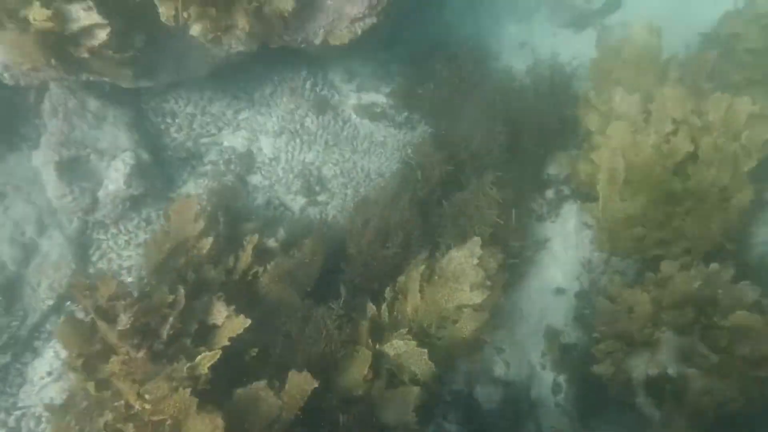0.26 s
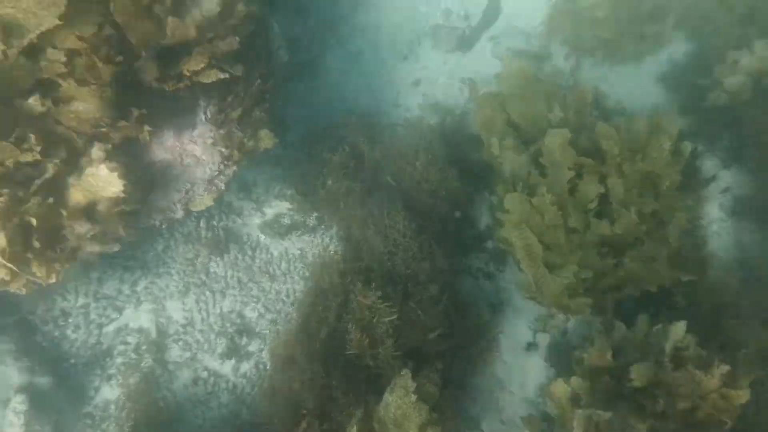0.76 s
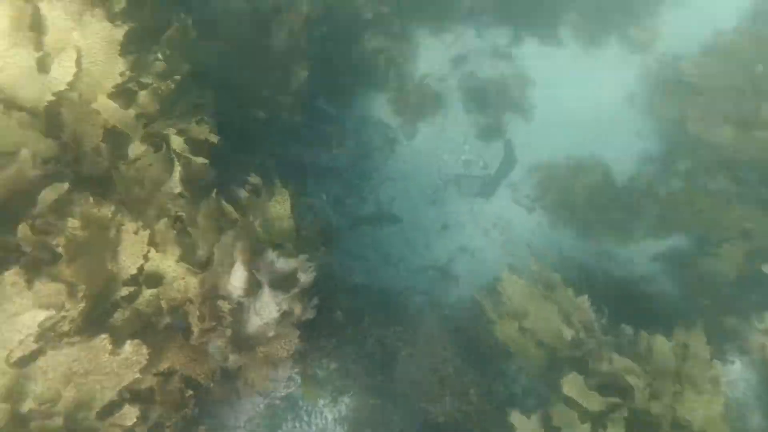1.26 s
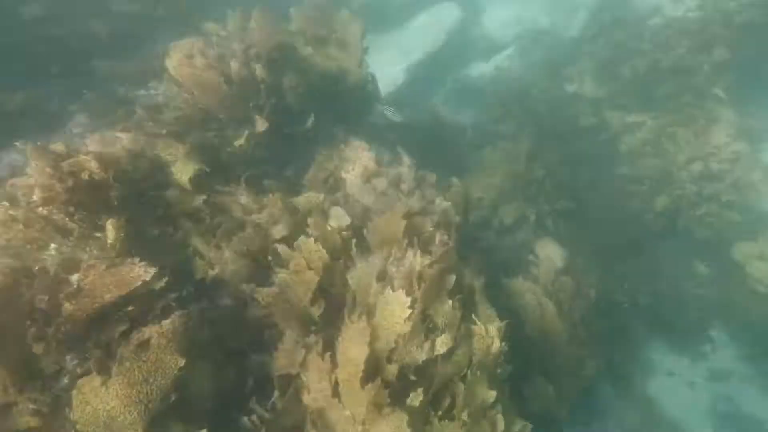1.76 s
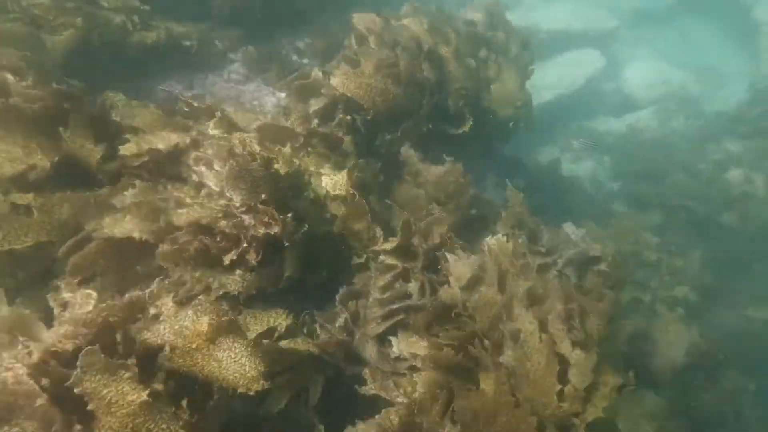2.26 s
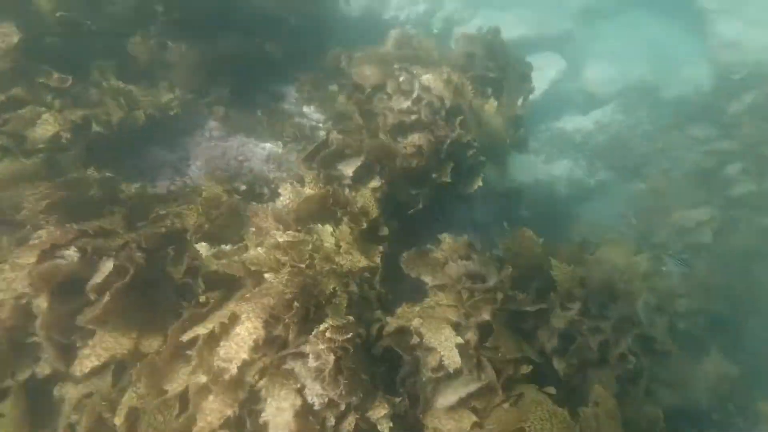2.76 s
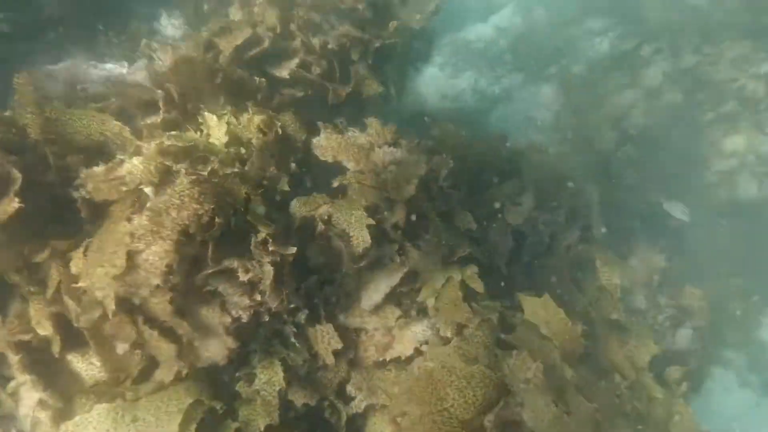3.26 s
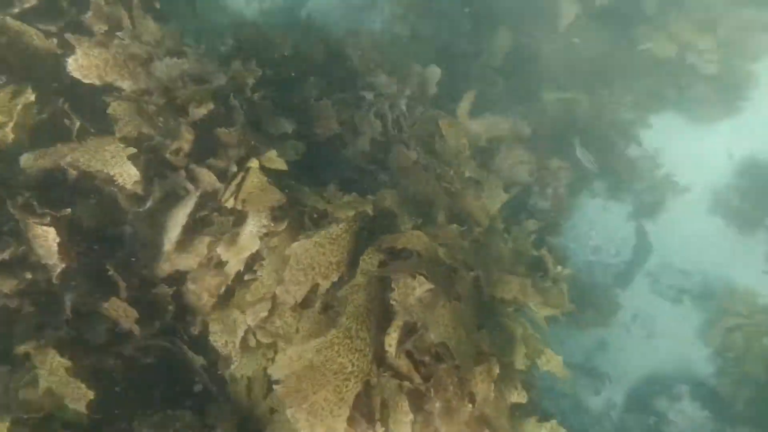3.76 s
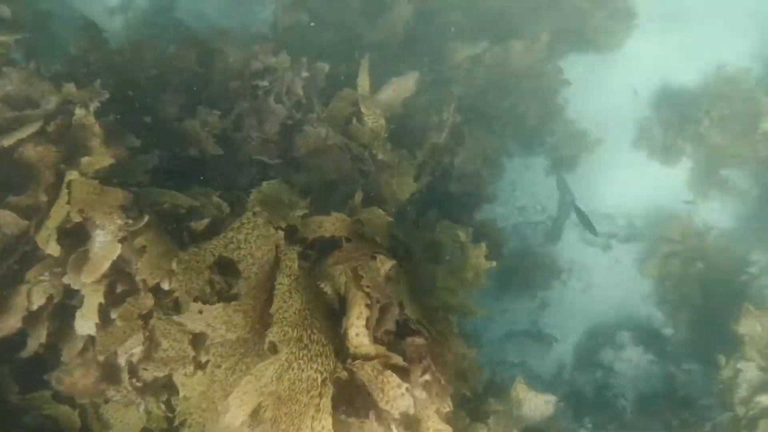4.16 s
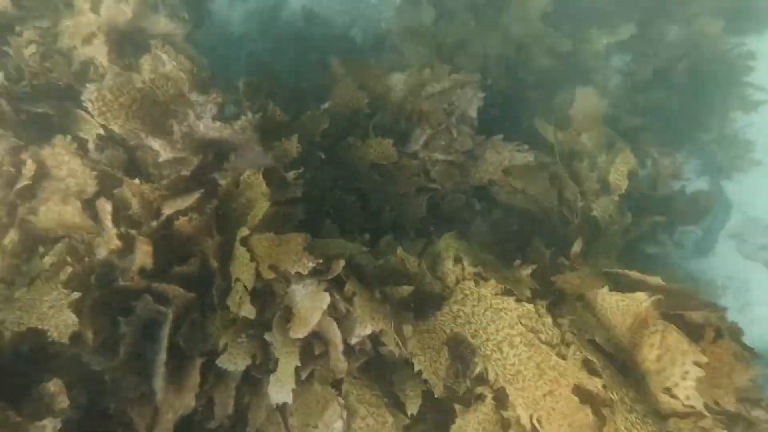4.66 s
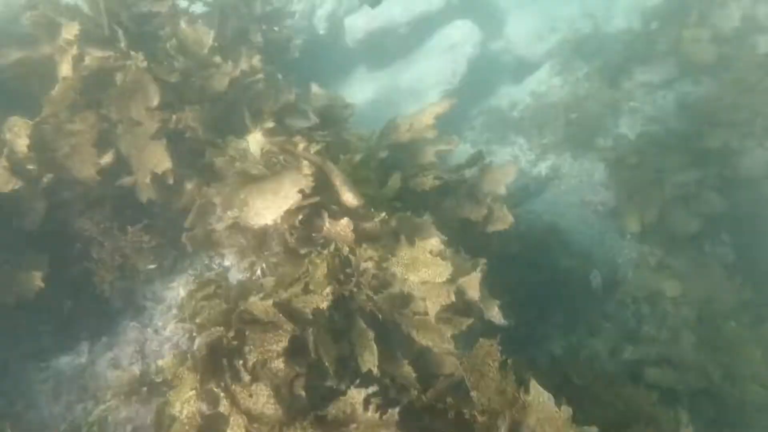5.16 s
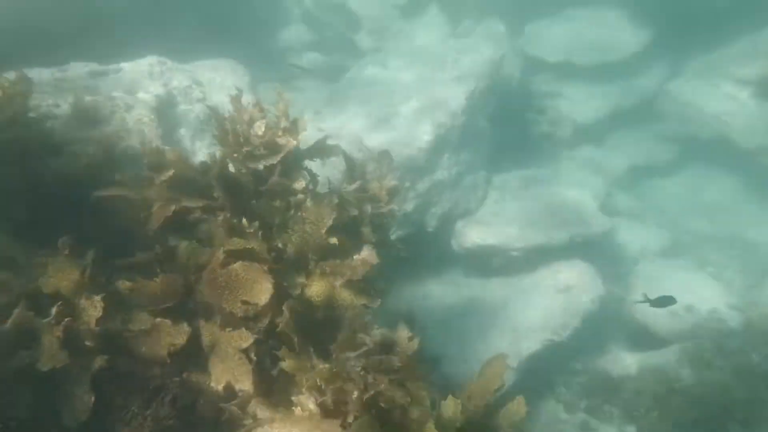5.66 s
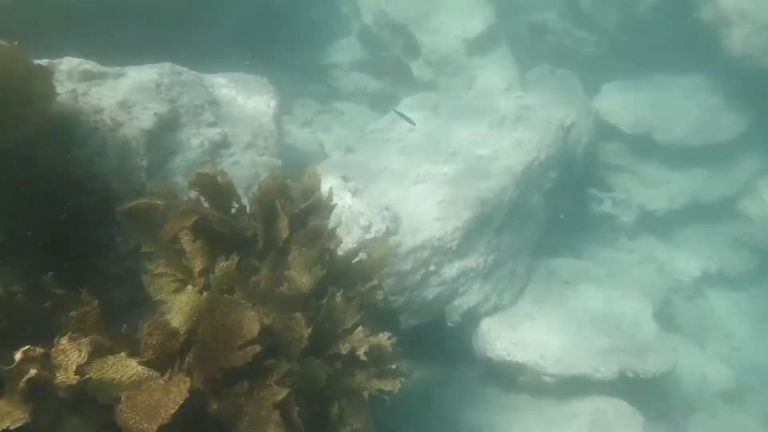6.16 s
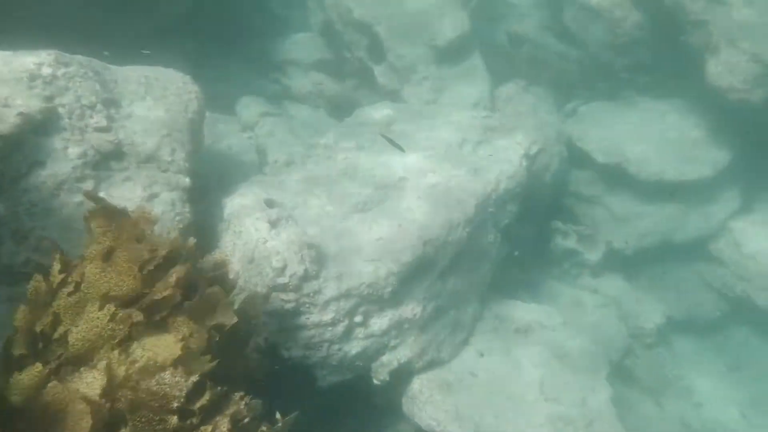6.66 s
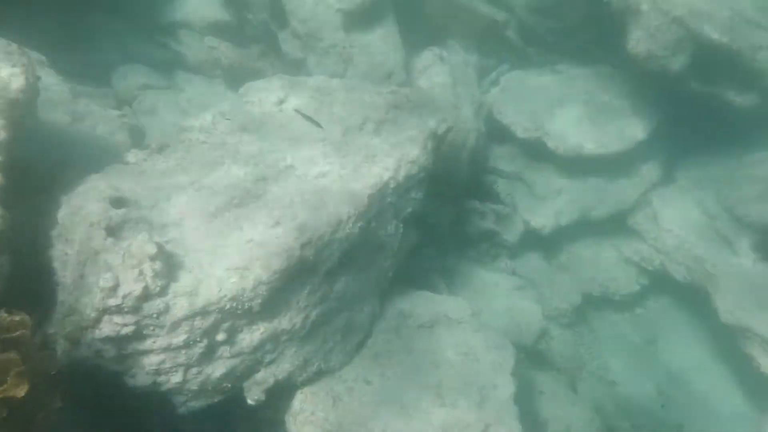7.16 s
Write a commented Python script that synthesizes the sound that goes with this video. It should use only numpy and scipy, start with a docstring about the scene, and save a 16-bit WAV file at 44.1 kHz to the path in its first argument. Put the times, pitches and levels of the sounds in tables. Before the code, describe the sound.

Dense snapping-shrimp crackle over a low underwater rumble, with glugs, knocks and sloshing thumps, briefly cutting to silence before returning sparser and duller.

```python
"""Snapping shrimp crackle all around a camera in a sealed housing that drifts over a shallow kelp reef.
Each snap is a sharp pulse, scattered by rock and coloured by the resonances of the housing; far snaps merge
into a wash. Glugs and short soft knocks are brief ringing tones, some gliding; moving water rumbles, sloshes
and thumps as shaped noise and short rings. The sound cuts out for a moment and returns sparser and duller
over bare boulders.
"""
import sys
import numpy as np
from scipy import signal
from scipy.fft import rfft, irfft, next_fast_len
from scipy.io import wavfile
from scipy.ndimage import uniform_filter1d

SR = 44100
rng = np.random.default_rng(int(sys.argv[2]) if len(sys.argv) > 2 else 0)


def dump_mix(stems):
    """Bounce the given channels to the path in sys.argv[1] as a 16-bit WAV at rate SR."""
    frames = np.atleast_2d(stems).T  # one column per channel
    limited = np.clip(frames, -1, 1)  # hard clip at full scale
    pcm = np.round(limited * 32767).astype(np.int16)
    wavfile.write(sys.argv[1], SR, pcm)


N = 326781
TIME = np.arange(N) / SR
SILENT_FROM, SILENT_TO = 5.853, 6.061  # s, the gap between kelp and boulders
SNAP_SIZE = 2048  # samples


def undb(db):
    """Amplitude ratio: decibels to gain."""
    return 10 ** (np.asarray(db) / 20)


def unit(x):
    """Normalisation: scale to rms 1."""
    return x / np.sqrt(np.mean(x ** 2))


def curves(table):
    """Linear interpolation: each column of a timed table as a value per sample."""
    s, *columns = np.transpose(table)
    return [np.interp(TIME, s, c) for c in columns]


def add(track, s, sound):
    """Superposition: mix a sound into a track at a time in seconds."""
    start = max(int(s * SR), 0)
    part = track[..., start:start + sound.shape[-1]]
    part += sound[..., :part.shape[-1]]


def ports(mid, side):
    """Sum and difference: left and right port from the shared and the opposed motion."""
    return np.array([mid + side, mid - side])


def frequencies(size):
    """Frequency grid in Hz, raised by 1 Hz to keep clear of zero."""
    return np.fft.rfftfreq(size, 1 / SR) + 1


def bands(size):
    """Complementary crossover: low, middle and treble weights that sum to one."""
    f = np.fft.rfftfreq(size, 1 / SR)
    low, below_treble = (1 / (1 + (f / hz) ** 10) for hz in (900, 2400))
    return np.array([low, below_treble - low, 1 - below_treble])


def causal(gain):
    """Minimum phase, by folding the cepstrum: the response starts at once and rings afterwards."""
    cepstrum = irfft(np.log(gain + 1e-7))
    half = cepstrum.shape[-1] // 2
    cepstrum[..., 1:half] *= 2
    cepstrum[..., half + 1:] = 0
    return np.exp(rfft(cepstrum))


def ringing(hz, width, size):
    """Simple resonance: gain of one resonator whose width is a share of its pitch."""
    f = frequencies(size)
    return 1 / np.sqrt(1 + ((f / hz - hz / f) / width) ** 2)


def housing(modes, size):
    """Modal summation: the powers of steep resonances add into shared and opposed gain."""
    f = frequencies(size)
    power = 0
    for hz, width, mid_db, side_db in modes:
        skirt = 1 / (1 + ((f * f - hz * hz) / (f * width)) ** 2)
        power = power + (undb([[mid_db], [side_db]]) * skirt) ** 2
    return np.sqrt(power)


def flurry(rate, depth_db):
    """Slow random modulation: a gain drawn `rate` times a second, with straight dB lines between."""
    knots = rng.standard_normal(1024)
    return undb(depth_db * np.interp(TIME * rate, np.arange(len(knots)), knots))


def grains(low_hz, high_hz, cycles, spread_db, rise, count, size):
    """Shot noise: short rings at random times, pitches and strengths; shared and opposed parts, rms 1."""
    when, pitch, life, strength, direction = rng.random((count, 5)).T[:, :, None]
    hz = low_hz * (high_hz / low_hz) ** pitch
    turns = hz * np.arange(size) / SR
    age = turns / (cycles * 2 ** (2 * life - 1))
    gain = undb(-spread_db * np.log(np.maximum(strength, .02))) * np.sqrt(hz)
    bent_turns = turns * (1 + rise * np.minimum(age, 10) / 10)
    rings = gain * age * np.exp(-age) * np.sin(2 * np.pi * bent_turns)
    places = ((when * N).astype(int) + np.arange(size)).ravel()
    weights = (1, np.cos(np.pi * direction))
    return np.array([unit(np.bincount(places, (rings * w).ravel(), N)[:N]) for w in weights])


def crackle(rings, modes, band, echo, echo_s, wash_db, side_db):
    """Multipath scattering: far rings get ragged echoes, the farthest merge into a wash; shared rms 1."""
    t = np.arange(SNAP_SIZE) / SR
    path = rng.standard_normal((2, SNAP_SIZE)) * np.exp(-t / echo_s)
    path *= echo / np.linalg.norm(path[0])
    path[:, 0] += 1  # the direct sound
    walls = housing(modes, SNAP_SIZE)
    heard_path = irfft(rfft(path) * causal(walls))
    pops = signal.oaconvolve(rings, heard_path, axes=1)[:, :N]
    wash_response = irfft(causal(walls * (np.array(band) @ bands(SNAP_SIZE))))
    wash = signal.oaconvolve(rng.standard_normal((2, N)), wash_response, axes=1)[:, :N]
    mid, side = pops / np.std(pops[0]) + undb(wash_db) * wash / np.std(wash[0])
    return ports(mid, undb(side_db) * side) / np.std(mid)


def hiss():
    """White noise: a faint steady hiss, independent in the two ports."""
    return undb(-77.5) * rng.standard_normal((2, N))


# strength of the moving water: (time [s], rumble level before trim [dB])
SURGE = [(0, -43.5), (.9, -45.5), (1.8, -43.5), (1.92, -40), (2.27, -43), (2.55, -44.5), (3.4, -44),
         (3.9, -45.5), (4.25, -43.5), (4.7, -45), (5, -41.5), (5.36, -43.5), (5.5, -44.5), (5.78, -40.5),
         (6.06, -49), (6.22, -50), (6.42, -50.5), (7.3, -50.5)]
# spectrum of the pressure of the eddies: (frequency [Hz], relative level per Hz [dB])
EDDY_SPECTRUM = [(10, -18.5), (20, -10), (32, 1.5), (50, -11.5), (85, -10), (125, -15), (170, -29),
                 (300, -32), (700, -47.5), (2000, -98)]
# eddies above EDDY_HZ grow faster than the deep rumble, by EDDY_GROWTH dB per dB of surge over CALM_DB
EDDY_HZ, EDDY_GROWTH, CALM_DB = 50, 1, -43.5


def rumble(trim_db=-2.5, side_db=-25):
    """Turbulent pressure: eddies press nearly alike on both ports; stronger flow stirs up smaller ones."""
    hz, db = np.transpose(EDDY_SPECTRUM)
    size = 2 * next_fast_len(N // 2 + 1)
    f = frequencies(size)
    spectrum = rfft(rng.standard_normal((2, size))) * undb(np.interp(np.log(f), np.log(hz), db))
    whole = irfft(spectrum)[:, :N]
    deep = irfft(spectrum / (1 + (f / EDDY_HZ) ** 4))[:, :N]
    surge_db = curves(SURGE)[0]
    small = (whole - deep) * undb(EDDY_GROWTH * (surge_db - CALM_DB))
    mid, side = (deep + small) / np.std(whole)
    heaves = flurry(rate=11, depth_db=1.0)
    return ports(mid, undb(side_db) * side) * undb(surge_db + trim_db) * heaves


# water sloshing past the housing:
# (time [s], half length to 1/e [s], churn peak level [dB], fizz peak level [dB])
SWASHES = [(1.562, 0.042, -56, -52.5), (1.873, 0.022, -34.5, -52), (1.976, 0.023, -30.5, -46.5),
           (2.025, 0.049, -48, -50.5), (2.259, 0.011, -42, -38), (2.319, 0.029, -40.5, -47.5),
           (2.459, 0.027, -76, -43.5), (4.076, 0.012, -41, -47), (4.412, 0.02, -52, -46),
           (5.167, 0.052, -48.5, -58), (5.319, 0.043, -42, -58), (5.705, 0.058, -41, -48)]
# resonances of the churning water:
# (frequency [Hz], width [Hz], relative level alike in both ports [dB], relative level opposed [dB])
CHURN_MODES = [(104, 79, -5.5, -22), (219, 54, -2.5, -31), (305, 1600, -3.5, -37.5), (552, 96, -5, -39.5)]
# resonances of the housing over the kelp, also heard by the shrimp there:
# (frequency [Hz], width [Hz], relative level alike in both ports [dB], relative level opposed [dB])
KELP_MODES = [(336, 350, -4.5, -22.5), (587, 650, -3, -38.5), (980, 1090, -4, -53.5),
              (1408, 390, 2.5, -8.5), (2064, 280, -7.5, -8), (2770, 480, -25.5, -16.5),
              (3136, 360, -10, -13.5), (3514, 1250, -39, -2.5), (4500, 830, -12, -24),
              (5200, 770, -18, -31.5), (6300, 1140, -16, -10), (7920, 2560, -28, -23.5),
              (9550, 3800, -51, -35.5), (12150, 2500, -65, -62.5), (15100, 1000, -47, -43.5)]


def swashes():
    """Bubble entrainment: a shove of water churns large air pockets and tears off a fizz of tiny ones."""
    large = grains(87.7, 625, cycles=2.1, spread_db=2.0, rise=0.022, count=420, size=2048)
    tiny = grains(1797, 7960, cycles=2.35, spread_db=3.5, rise=0.034, count=5000, size=192)
    churn = crackle(large, CHURN_MODES, (1, 0, 0), echo=0.27, echo_s=0.04, wash_db=-13, side_db=3.0)
    fizz = crackle(tiny, KELP_MODES, (0, .2, 1), echo=0.4, echo_s=0.0053, wash_db=-10.5, side_db=-5.0)
    s, half, churn_db, fizz_db = np.transpose(SWASHES)[:, :, None]
    swell = np.exp(-np.minimum(((TIME - s) / half) ** 2, 20))
    churn_gain = np.sum(swell * undb(churn_db), axis=0)
    fizz_gain = np.sum(swell * undb(fizz_db), axis=0)
    return churn * churn_gain + fizz * fizz_gain


PORT_LAG_S, PORT_LAG_SPREAD_S = 2e-5, 3e-5  # mean and spread of how much later a ring reaches the left port


def damped_rings(table, attack_s, splash, splash_s, waver, waver_s):
    """Damped oscillation: each (s, Hz, dB, decay s, octaves/s) is jolted, then rings at a wavering pitch."""
    out, t = np.zeros((2, N)), np.arange(SR // 4) / SR
    chance, slow = rng.standard_normal((len(table), 2, len(t))), int(waver_s * SR)
    for (s, hz, db, decay, glide), noise in zip(table, chance):
        jolt, wobble = (unit(uniform_filter1d(uniform_filter1d(n, slow), slow)) for n in noise)
        pitch = hz * (2 ** (glide * np.minimum(t, 3 * decay)) + waver * wobble)
        phase = 2 * np.pi * np.cumsum(pitch) / SR
        swell = (1 - np.exp(-t / attack_s)) ** 2 * np.exp(-t / decay)
        turn = np.pi * hz * (PORT_LAG_S + PORT_LAG_SPREAD_S * noise[0, 0])  # half the phase lag
        ring = swell / swell.max() * np.sin(ports(phase, -turn))
        add(out, s, undb(db) * ring * (1 + splash * jolt * np.exp(-t / splash_s)))
    return out


def hum():
    """Frequency glide: a faint low tone rises at the very end."""
    return damped_rings([(7.17, 145.7, -60, .3, 0.94)], attack_s=.015, splash=.2, splash_s=.05,
                        waver=0.031, waver_s=0.0035)


# water shoving the housing: (time [s], pitch [Hz], peak level before the jolt [dB], decay time [s])
THUMPS = [(1.873, 192, -30.5, 0.011), (1.881, 114, -30.5, 0.024), (1.965, 119.4, -26, 0.029),
          (2.004, 34.8, -27.5, 0.03), (2.11, 116, -39.5, 0.032), (2.204, 47, -28.5, 0.022),
          (2.243, 118.2, -37, 0.025), (5.348, 46.3, -29.5, 0.017), (5.587, 111.4, -29, 0.0065),
          (5.705, 113.4, -26, 0.035), (5.765, 34.7, -38, 0.0091)]


def thumps():
    """Impulsive loading: shoves of water knock on the housing or heave slowly against it."""
    return damped_rings([(*row, 0) for row in THUMPS], attack_s=0.0037, splash=.3, splash_s=0.0077,
                        waver=0.049, waver_s=0.0015)


# air pockets and short soft knocks:
# (time [s], starting pitch [Hz], peak level before the jolt [dB], decay time [s], glide [octaves/s])
GLUGS_AND_KNOCKS = [(.521, 349, -27, .016, -3), (.653, 232, -34.5, 0.015, 2), (.895, 312, -21, .011, 15.5),
                    (1.552, 288, -26, 0.011, -8.5), (1.715, 1466, -28.5, 0.022, 1.5),
                    (1.745, 1550, -29, 0.0043, 1), (1.843, 436, -32.5, 0.0053, 2),
                    (1.888, 460, -34.5, 0.016, 1.5), (1.914, 1360, -32.5, 0.0065, 0),
                    (1.962, 438, -31, 0.01, -3), (2.017, 1460, -29, 0.0051, 5.5),
                    (2.316, 306, -25.5, 0.005, -4), (2.444, 1406, -22.5, 0.0036, 2),
                    (2.845, 180, -28.5, 0.0041, 0), (3.68, 458, -20, 0.0052, -11),
                    (3.718, 1320, -25.5, 0.0096, -2), (3.852, 498, -32, 0.026, 1.5),
                    (3.854, 1394, -21.5, 0.013, -9), (4.061, 268, -19, 0.017, -6),
                    (4.457, 366, -22, 0.0093, 5.5), (4.711, 1380, -30.5, 0.0066, -2),
                    (4.909, 1268, -28, 0.016, 2), (5.063, 182.4, -22, 0.027, 0),
                    (5.255, 743, -36, 0.018, 1), (5.417, 1512, -22.5, 0.0058, -0.5),
                    (5.57, 454, -31, 0.0019, -1), (5.6035, 1350, -21, 0.003, 0.5),
                    (5.655, 312, -35.5, 0.01, -10), (5.717, 558, -36, 0.018, 1),
                    (5.721, 1520, -29.5, 0.0091, 0), (5.762, 1240, -39.5, 0.0046, 0),
                    (6.199, 620, -37.5, 0.0039, -1), (6.316, 600, -44, .003, 2),
                    (6.343, 690, -27, 0.0056, 7), (6.375, 700, -40, 0.0069, -2),
                    (6.404, 735, -39.5, 0.0062, -6), (6.514, 670, -40.5, .006, 13),
                    (6.589, 730, -39, 0.01, -3), (6.666, 600, -45, 0.0033, 6),
                    (6.707, 370, -29.5, 0.005, -16), (6.945, 700, -29, 0.0054, -1.5),
                    (6.997, 630, -36.5, 0.0019, 3)]


def glugs_and_knocks():
    """Damped free vibration: air pockets and short soft knocks are brief ringing tones, some gliding."""
    return damped_rings(GLUGS_AND_KNOCKS, attack_s=0.00057, splash=0.31, splash_s=0.017,
                        waver=0.027, waver_s=0.0022)


# brief bright rings at the top of the treble: (time [s], starting level [dB])
GLINTS = [(.843, -56), (2.25, -53), (2.465, -53), (2.49, -57), (2.884, -58), (3.559, -59), (4.134, -51),
          (5.258, -44), (5.819, -57)]
# highest resonances of the housing:
# (frequency [Hz], width [Hz], relative level alike in both ports [dB], relative level opposed [dB])
BRIGHT_MODES = [(10000, 3500, -5.5, -3.5), (15100, 1200, 5, -5.5)]


def glints(decay_s=0.0025):
    """Modal excitation: decaying noise bursts through high resonances give brief bright rings."""
    jolt, t = np.zeros(N), np.arange(SNAP_SIZE) / SR
    for s, db in GLINTS:
        add(jolt, s, undb(db) * np.exp(-t / decay_s))
    ring = irfft(causal(housing(BRIGHT_MODES, SNAP_SIZE)))
    ring /= np.linalg.norm(ring[0])
    return ports(*signal.oaconvolve(jolt * rng.standard_normal((2, N)), ring, axes=1)[:, :N])


def lesser_snaps(nearest, count, bunch_s, body_db, tick_db, low_below_db, body_spread_db, tick_spread_db, length_s):
    """Clustered point process: weaker snaps fall at random around the nearest and borrow their pitches."""
    when, low, body, tick, length = rng.uniform(-1, 1, (count, 5)).T
    parent = np.array(nearest)[rng.integers(len(nearest), size=count)]
    s = parent[:, 0] + bunch_s * (when + .5)
    body = body_db + body_spread_db * body
    low = body - low_below_db + body_spread_db * low
    tick = tick_db + tick_spread_db * tick
    pitches = parent[::-1, -2:]  # shuffled among the bunches
    return np.column_stack([s, low, body, tick, length_s * 2 ** (2 * length), pitches])


RIPPLE_DB, RIPPLE_HZ = 4.5, 419  # rms depth and spacing of the random peaks and dips that echoes give each snap


def snaps(table, modes, trim_db, sharp, tail_db, tail_s, lead_s, body_width, tick_width, side_db, likeness):
    """Cavitation collapse: one sharp pulse; nearby rock scatters it, the reef adds a tail, the housing rings."""
    onset = SNAP_SIZE // 8
    out, t = np.zeros((2, N)), (np.arange(SNAP_SIZE) - onset) / SR
    walls, split = housing(modes, SNAP_SIZE), bands(SNAP_SIZE)
    whole = np.hypot(*walls)
    ripple_at = np.fft.rfftfreq(SNAP_SIZE, 1 / SR) / RIPPLE_HZ
    # noise rises briefly before the pulse and dies away after it
    tail = np.exp(np.minimum(t / lead_s, -t / tail_s))
    tail *= undb(tail_db) / np.linalg.norm(tail)
    chance = rng.standard_normal((len(table), 2, SNAP_SIZE))
    for (s, low_db, body_db, tick_db, length, body, tick), noise in zip(table, chance):
        age = np.maximum(t / max(length / 2, 2 / SR) + .5, 0)
        burst = age * np.exp(-age)
        push = noise * (burst / np.linalg.norm(burst) + tail)
        push[0, onset] += sharp
        spectrum = rfft(push)
        # the opposed motion partly follows the shared one, a quarter cycle apart
        following = 1j * (2 * split[2] - 1) * spectrum[0]
        spectrum[1] = likeness * following + np.sqrt(1 - likeness ** 2) * spectrum[1]
        # every snap favours its own two resonances
        body_ring = ringing(body, body_width, SNAP_SIZE)
        tick_ring = ringing(tick, tick_width, SNAP_SIZE)
        colour = split * [np.ones(len(body_ring)), body_ring, tick_ring]
        colour = colour * undb(RIPPLE_DB * np.interp(ripple_at, np.arange(SNAP_SIZE), noise[0, ::-1]))
        # band levels are the rms of the band's energy spread over a hundredth of a second
        energy = np.sum(irfft(spectrum * walls * colour[:, None]) ** 2, axis=(1, 2))
        gains = undb(np.add([low_db, body_db, tick_db], trim_db)) * np.sqrt(SR / 100 / energy)
        response = causal(whole * (gains @ colour)) * walls / whole
        add(out, s + t[0], irfft(spectrum * response))
    return ports(out[0], undb(side_db) * out[1])


# resonances of the housing over the boulders:
# (frequency [Hz], width [Hz], relative level alike in both ports [dB], relative level opposed [dB])
ROCK_MODES = [(365, 580, -11.5, -23.5), (720, 290, -0.5, -13.5), (1120, 1160, -11.5, -12),
              (1760, 630, -12, 4), (2330, 440, -2.5, -17), (3060, 600, -13, -6.5), (4070, 1400, -23, -20.5),
              (6500, 2800, -44, -42), (11100, 7000, -51, -54)]
# the nearest snaps, over boulders and kelp: (time [s], low level before trim [dB], body level before trim [dB],
# tick level before trim [dB], nominal burst length [s], body pitch [Hz], tick pitch [Hz])
SNAPS = [(0.1127, -39, -34, -42.5, 0.0046, 1040, 6100), (0.169, -63, -45, -40.5, 0.0074, 1200, 4870),
         (0.238, -48, -42, -47, 0.0067, 1400, 2700), (0.329, -40, -47, -50, 0.022, 1200, 6250),
         (0.346, -60, -55, -43, 0.001, 1050, 6940), (0.476, -34, -28.5, -30.5, 0.0011, 1360, 3870),
         (0.652, -45, -40.5, -38, 0.0022, 1170, 7200), (0.68, -48, -43, -41, 0.001, 1400, 6040),
         (0.798, -33, -47, -34, 0.00012, 1230, 6350), (0.844, -58, -35, -26.5, 0.00056, 1490, 5300),
         (0.985, -69, -39.5, -44, 0.0028, 2220, 4700), (1.1219, -55, -32.5, -49, 0.0012, 1070, 3900),
         (1.128, -36, -27, -39, 0.0011, 1510, 2600), (1.145, -36, -35, -41, 0.01, 1500, 5570),
         (1.167, -42, -33.5, -41, 0.031, 1360, 3140), (1.198, -36.5, -46, -46, 0.0012, 1110, 3420),
         (1.2096, -43, -37.5, -36, 0.00091, 1510, 4500), (1.2517, -35.5, -27, -41.5, 0.0019, 1230, 4050),
         (1.3282, -39.5, -26.5, -35, 0.00091, 1570, 2980), (1.504, -65, -65, -31.5, 0.0066, 1290, 3500),
         (1.542, -38, -36, -43, 0.0046, 1370, 3900), (1.651, -47, -49, -38, 0.0052, 1770, 6500),
         (1.8697, -33.5, -27, -44, 0.00047, 1290, 6600), (1.8937, -42, -38.5, -44, 0.0097, 2050, 2580),
         (1.9865, -36.5, -26, -46, 0.0015, 1230, 3090), (1.998, -57, -32, -39, 0.0076, 2300, 4670),
         (2.016, -45, -32.5, -34, 0.0022, 1300, 3820), (2.056, -55, -37, -37, 0.0048, 1610, 3080),
         (2.0663, -46.5, -44, -40, 0.0025, 1770, 3570), (2.15, -65, -41, -36, 0.0014, 1750, 4570),
         (2.207, -65, -64, -38, 0.00062, 1430, 7200), (2.252, -59, -34.5, -30, 0.00094, 2310, 2460),
         (2.325, -42, -36.5, -43.5, 0.0038, 1230, 5270), (2.365, -48, -34, -43, 0.0095, 1440, 3820),
         (2.395, -36, -30.5, -33.5, 0.0022, 1430, 4230), (2.495, -65, -30.5, -29, 0.0014, 2300, 4640),
         (2.529, -68, -33, -31.5, 0.0025, 2350, 3180), (2.563, -57, -55, -37.5, 0.00098, 1510, 4400),
         (2.618, -59, -63, -39, 0.00088, 1500, 5300), (2.727, -56, -45, -38, 0.002, 1040, 4400),
         (2.84, -47.5, -32, -69, 0.0013, 1250, 5700), (2.849, -39, -31.5, -46, 0.0025, 1050, 2600),
         (2.866, -41.5, -30, -23.5, 0.019, 1640, 4680), (2.901, -49, -38, -47, 0.002, 1440, 5280),
         (2.909, -44, -33.5, -41, 0.0012, 1560, 3880), (2.933, -49, -33.5, -43.5, 0.00083, 1560, 5060),
         (2.9545, -62, -59, -40.5, 0.001, 1700, 5700), (3.0614, -62, -37, -68, 0.001, 1460, 4800),
         (3.071, -67, -41, -40, 0.00067, 1530, 5900), (3.107, -57, -40, -37.5, 0.0004, 1360, 5840),
         (3.1967, -43, -28, -27, 0.0011, 1340, 3420), (3.211, -42, -40.5, -34, 0.00029, 2180, 4500),
         (3.263, -70.0, -36.5, -31, 0.0034, 2300, 3880), (3.338, -52, -63, -40.5, 0.0013, 1860, 5250),
         (3.366, -49, -38.5, -34.5, 0.0026, 1940, 4900), (3.38, -61, -56, -32.5, 0.0014, 1440, 4670),
         (3.4023, -66, -61, -38.5, 0.0013, 1440, 5360), (3.489, -76, -38.0, -48, 0.0035, 1300, 5000),
         (3.508, -60, -46, -65, 0.0017, 1300, 4000), (3.544, -57, -36, -61, 0.001, 1230, 5000),
         (3.55, -50, -32.5, -48, 0.0018, 1110, 5660), (3.559, -55, -35.5, -43, 0.00063, 1300, 9800),
         (3.577, -75, -57, -34.5, 0.0022, 1360, 5900), (3.5863, -70, -40.5, -35, 0.0023, 2070, 3830),
         (3.6416, -46.5, -69, -35, 0.00059, 2070, 4430), (3.7058, -39, -37, -36, 0.0056, 1190, 3870),
         (3.786, -72, -36.5, -27, 0.0037, 2070, 4000), (3.928, -58, -32.5, -41, 0.00019, 1190, 3570),
         (3.9344, -40.5, -25, -30, 0.001, 1550, 3340), (3.983, -56, -42, -36.5, 0.0063, 1510, 4400),
         (4.114, -40.5, -29, -66, 0.004, 1070, 3300), (4.13, -53, -31, -29, 0.0068, 1290, 3350),
         (4.134, -33.5, -30, -31, 0.00051, 1060, 4020), (4.195, -36.5, -30, -45, 0.0034, 1460, 5270),
         (4.2044, -51, -36, -47, 0.0072, 1300, 3780), (4.172, -44, -38, -69, .004, 1200, 4000),
         (4.255, -75, -44, -35.5, 0.0043, 1870, 4630), (4.32, -54, -46, -35, 0.0026, 1360, 4450),
         (4.3266, -42, -36.5, -39, 0.0048, 1360, 3800), (4.377, -64, -66, -40, 0.0015, 1360, 5000),
         (4.404, -43, -28.5, -32.5, 0.0075, 1940, 4400), (4.428, -70, -62, -35.5, 0.00079, 1360, 6700),
         (4.445, -57, -40, -54, 0.0018, 1350, 4500), (4.5702, -49, -35.5, -43, 0.00024, 1020, 4920),
         (4.748, -49, -71, -38.5, 0.0034, 1600, 6550), (4.776, -56, -38.5, -73, 0.0099, 1630, 5600),
         (4.806, -62, -43, -32.5, 0.0024, 1950, 5700), (4.8746, -54, -37.5, -40.5, 0.0034, 1300, 5600),
         (4.9328, -61, -39.5, -32, 0.00018, 1770, 5250), (4.9427, -60, -41.5, -36, 0.003, 1510, 4300),
         (4.956, -60, -48, -49, 0.001, 1890, 6910), (4.9673, -61, -45, -32, 0.0013, 2070, 6300),
         (4.98, -62, -39.5, -47, 0.001, 1400, 5000), (5.005, -35.5, -32.0, -35.5, 0.0025, 1680, 2800),
         (5.015, -65, -44, -38, 0.0024, 1360, 6200), (5.034, -56, -33.5, -56, 0.0015, 1020, 5040),
         (5.0655, -44, -26, -30.5, 0.0004, 1130, 5650), (5.082, -44, -35, -41, 0.0055, 1340, 4980),
         (5.2586, -55, -58, -42.5, 0.003, 1360, 8250), (5.266, -54, -60, -38, 0.002, 1600, 6700),
         (5.337, -45.5, -65, -37, 0.001, 2070, 6300), (5.37, -56, -37, -55, 0.0016, 1510, 6500),
         (5.5105, -68, -41, -32, 0.0045, 2340, 4400), (5.599, -39, -40, -48, 0.0084, 1300, 3800),
         (5.6186, -45, -29, -55, 0.0024, 1320, 3800), (5.689, -57, -41.5, -35, 0.0078, 1870, 3450),
         (5.72, -59, -40, -37, 0.016, 1660, 2930), (5.753, -68, -39, -31, 0.0028, 2180, 5670),
         (5.82, -52, -60, -42.5, 0.00062, 2300, 8140), (6.0637, -43, -43, -49.5, 0.0027, 1186, 2310),
         (6.258, -38, -25.5, -50, 0.00099, 1410, 2270), (6.269, -45.5, -39, -50, 0.0034, 1820, 2320),
         (6.3747, -35.5, -45.5, -53, 0.0056, 1300, 3000), (6.456, -51, -51, -51, 0.015, 1650, 2840),
         (6.492, -62, -41.5, -55, 0.0069, 1820, 3300), (6.553, -53, -53, -44.5, 0.0048, 1660, 3330),
         (6.5768, -56, -71, -49, 0.0018, 1740, 3600), (6.6366, -68, -55, -47, 0.0027, 2400, 4000),
         (6.648, -77, -53.5, -41.5, 0.00069, 1580, 3170), (6.712, -37, -54, -58, 0.0071, 1200, 3870),
         (6.741, -58, -60, -39.5, 0.00021, 1820, 3600), (6.8683, -55, -38.5, -47.5, 0.0031, 1520, 3120),
         (6.926, -45, -50, -43.5, 0.0033, 1900, 2830), (7.0338, -56.5, -41.5, -48, 0.0035, 2210, 2400),
         (7.083, -81, -47, -52, 0.0042, 2000, 3360), (7.2668, -40, -27, -36, 0.0062, 1610, 2890),
         (7.281, -48, -34, -44, 0.0092, 1600, 2790)]


def rock_shrimp():
    """Sparse cavitation: fewer, duller snaps on the bare boulders."""
    gurgle = grains(442, 967, cycles=2.7, spread_db=4.5, rise=0.056, count=260, size=2048)
    ticks = grains(1700, 4600, cycles=0.54, spread_db=6.5, rise=.02, count=900, size=512)
    gurgle = crackle(gurgle, ROCK_MODES, (1, .3, 0), echo=0.88, echo_s=0.011, wash_db=-7.5, side_db=-5.5)
    ticks = crackle(ticks, ROCK_MODES, (0, .6, 1), echo=0.91, echo_s=0.0067, wash_db=-6, side_db=-3.5)
    nearest = [row for row in SNAPS if row[0] > SILENT_FROM]
    lesser = lesser_snaps(nearest, count=20, bunch_s=0.081, body_db=-62, tick_db=-61, low_below_db=0,
                          body_spread_db=4, tick_spread_db=2, length_s=0.0014)
    near = snaps([*nearest, *lesser], ROCK_MODES, trim_db=(0.0, 1.5, 1.5), sharp=0.033, tail_db=-5.5,
                 tail_s=0.021, lead_s=0.027, body_width=0.53, tick_width=0.28, side_db=-6.5, likeness=0.18)
    return near + gurgle * undb(-57.0) + ticks * undb(-65.5)


# far bubbling over the kelp: (time [s], pops level [dB], gurgle level before trim [dB])
BUBBLING = [(0, -48.5, -65), (.35, -49, -51.5), (.85, -45, -51.5), (1.3, -48, -63.5), (1.72, -42, -46.5),
            (2.05, -46, -64), (2.22, -48.5, -54.5), (2.45, -45, -56.5), (2.7, -52.5, -57), (3.3, -51, -68),
            (3.8, -44, -55), (4.03, -50.5, -55.5), (4.23, -45.5, -63), (4.6, -47.5, -63.5),
            (4.98, -49, -64.5), (5.16, -49, -54), (5.65, -57.5, -63)]
# far crackle over the kelp: (time [s], level [dB])
TICKING = [(0, -58.5), (.45, -58.5), (.72, -51.5), (1.3, -59.5), (2, -58), (2.75, -58), (3.15, -60),
           (3.75, -57), (4.05, -64.5), (4.35, -53), (4.6, -59), (5.8, -58.5)]


def kelp_shrimp(gurgle_trim_db=1.5):
    """Dense cavitation: a bright colony under the weed, with small bubbles gurgling in between."""
    pops_db, gurgle_db = curves(BUBBLING)
    ticks_db = curves(TICKING)[0]
    pops = grains(1100, 1850, cycles=2.5, spread_db=3.0, rise=0.067, count=2000, size=512)
    ticks = grains(2720, 9140, cycles=0.49, spread_db=5.0, rise=0.022, count=2000, size=256)
    gurgle = grains(309.0, 1127, cycles=1.4, spread_db=3.5, rise=0.02, count=2200, size=1024)
    pops = crackle(pops, KELP_MODES, (.3, 1, 0), echo=0.82, echo_s=0.016, wash_db=-5.0, side_db=-7.0)
    ticks = crackle(ticks, KELP_MODES, (0, 0, 1), echo=0.74, echo_s=0.0043, wash_db=-7.5, side_db=-7.5)
    gurgle = crackle(gurgle, KELP_MODES, (1, 0, 0), echo=0.79, echo_s=0.0097, wash_db=-8.5, side_db=-4.0)
    nearest = [row for row in SNAPS if row[0] < SILENT_FROM]
    lesser = lesser_snaps(nearest, count=70, bunch_s=.06, body_db=-50.5, tick_db=-46.5, low_below_db=21.5,
                          body_spread_db=4.0, tick_spread_db=1.5, length_s=0.0017)
    near = snaps([*nearest, *lesser], KELP_MODES, trim_db=(0.0, 0.5, 0.5), sharp=0.46, tail_db=-4.0,
                 tail_s=0.012, lead_s=0.0027, body_width=0.34, tick_width=0.34, side_db=-7.0, likeness=0.64)
    # snaps bunch up and thin out
    ticks = ticks * flurry(rate=15, depth_db=1.0) * undb(ticks_db)
    pops = pops * flurry(rate=24, depth_db=2.5) * undb(pops_db)
    gurgle = gurgle * undb(gurgle_db + gurgle_trim_db)
    return near + pops + gurgle + ticks + glints()


def scene():
    """Superposition: water, air and shrimp, with a short silence between kelp and boulders."""
    over_kelp, over_rocks = TIME < SILENT_FROM, TIME > SILENT_TO
    water = hiss() + rumble() + swashes() + hum() + thumps() + glugs_and_knocks()
    shrimp = np.where(over_kelp, kelp_shrimp(), rock_shrimp())
    heard = uniform_filter1d(1. * (over_kelp | over_rocks), size=64)  # softens the edges of the silence
    return heard * (water + shrimp)


def record(dry):
    """Band limiting: the camera cuts the top with a steep elliptic low-pass at 15.8 kHz."""
    return signal.sosfilt(signal.ellip(8, .2, 70, 15800, fs=SR, output="sos"), dry)


dry = scene()
out = record(dry)
dump_mix(out)
```